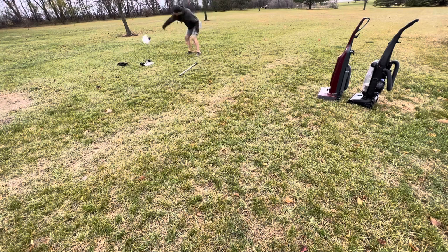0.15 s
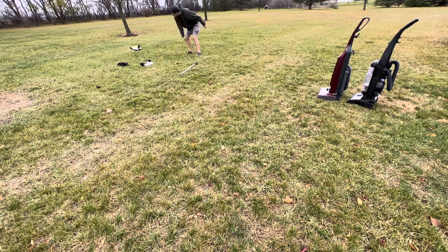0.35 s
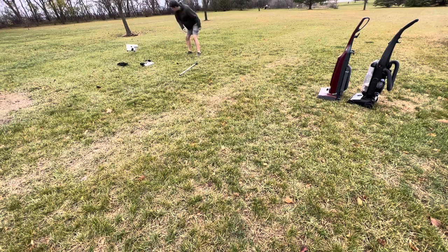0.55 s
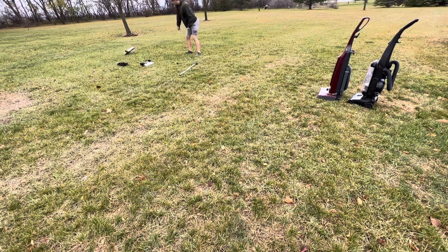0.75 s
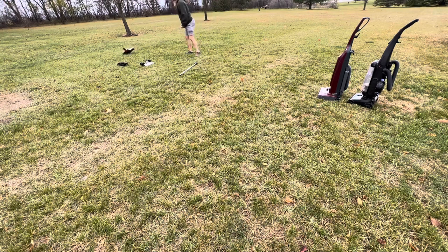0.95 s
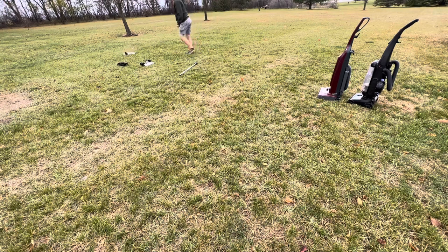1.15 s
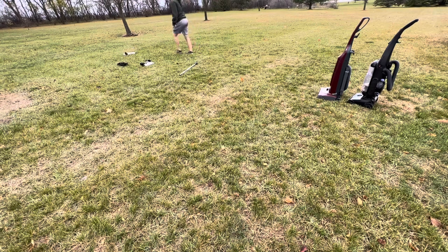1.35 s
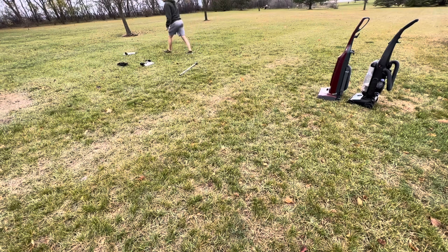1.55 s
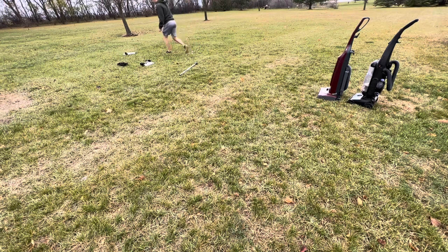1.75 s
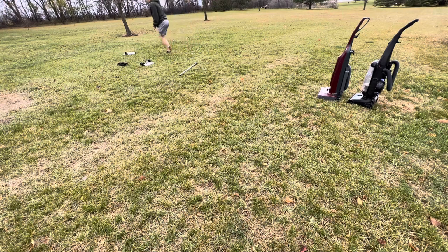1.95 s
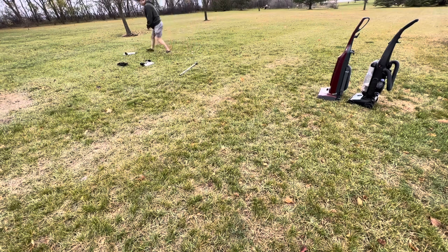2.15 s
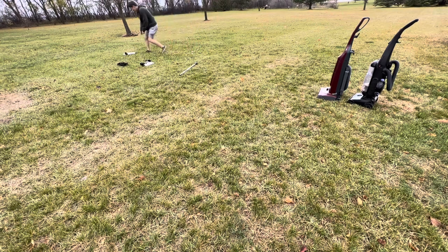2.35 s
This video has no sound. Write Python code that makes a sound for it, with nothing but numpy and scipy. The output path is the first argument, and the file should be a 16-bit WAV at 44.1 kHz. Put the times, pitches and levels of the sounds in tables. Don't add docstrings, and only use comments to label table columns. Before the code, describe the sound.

Wind flutters on an outdoor microphone, then a single sharp, hollow plastic smash with a brief faint echo; light fragment ticks and soft grass rustle follow, with a barely audible bird whistle near the end.

```python
import sys
import numpy as np
from scipy import signal
from scipy.fft import rfft, irfft
from scipy.io import wavfile
from scipy.ndimage import uniform_filter1d, map_coordinates

SR = 44100
rng = np.random.default_rng(int(sys.argv[2]) if len(sys.argv) > 2 else 0)


def waveform_to_disk(signal):
    frames = np.transpose(np.atleast_2d(signal))
    scaled = np.clip(frames, -1, 1) * 32767
    samples = np.round(scaled).astype(np.int16)
    wavfile.write(sys.argv[1], SR, samples)


def voltage_ratio(level):
    return 10 ** (np.asarray(level, float) / 20)


N = 105840

# (frequency [Hz], level [dB])
LAWN_BALANCE = [(150, 1), (1000, 4.5), (2200, -2), (6000, 3), (8300, -15), (9800, -11), (11200, 4),
                (15000, -1)]
# (frequency [Hz], phase [rad])
LAWN_LEAD = [(0, .2), (700, 1.3), (2500, 3.1), (4000, 5.7), (6000, 6.5), (7000, 9.1), (10000, 16),
             (16500, 27)]
# (frequency [Hz], level [dB])
WIDE_BALANCE = [(600, -0.5), (4400, 4.5), (8500, -4)]
SCATTER_DB = -22


def read(points, hz):
    f, v = np.transpose(points)
    return np.interp(np.log(hz + 1), np.log(f + 1), v)


def evened(x):
    return x / np.sqrt(np.mean(x ** 2) + 1e-20)


def coloured(x, points):
    return irfft(rfft(x) * voltage_ratio(read(points, np.fft.rfftfreq(N, 1 / SR))), N)


def drift(rate_hz, count):
    spectrum = rfft(rng.standard_normal((count, N)))
    hz = np.fft.rfftfreq(N, 1 / SR)
    x = irfft(spectrum / (1 + (hz / rate_hz) ** 2), N)
    return x / x.std(1, keepdims=True)


def ports(x, y, same, lead, side):
    hz = np.fft.rfftfreq(N, 1 / SR)
    half_balance = voltage_ratio(read(side, hz) / 2)
    shared, unshared = rfft(x), rfft(y)
    lag = np.exp(-1j * np.interp(hz, *np.transpose(lead)))
    right = same * shared * lag + np.sqrt(1 - same ** 2) * unshared
    return irfft(np.array([shared * half_balance, right / half_balance]), N)


def scatter(x):
    # (frequency [Hz], t60 [s])
    fading = [(300, 0.23), (4000, 0.6), (9000, 0.35), (15000, 0.14)]
    taps = rng.standard_normal((2, SR // 2))
    hz, t, z = signal.stft(taps, SR, nperseg=256)
    decay = voltage_ratio(-60 * t / read(fading, hz)[:, None])
    tail = signal.istft(z * decay, SR, nperseg=256)[1]
    wet = signal.fftconvolve(x[None], tail / np.linalg.norm(tail[0]), axes=1)[:, :N]
    sway_s, sway_hz = 0.00012, (23, 37)
    sway = sum(np.sin(2 * np.pi * f * np.arange(N) / SR) for f in sway_hz)
    at = np.arange(N) + sway_s * SR * sway
    return np.array([map_coordinates(v, [at], order=3) for v in wet])


def knocks(rows, colour, ring):
    # (frequency [Hz], level [dB], t60 [s])
    modes = [(120, 2.5, 0.1), (189.7, -7, 0.036), (260, -5, .03), (360, 4, 0.018), (480, 6.5, 0.05),
             (634, 5.5, 0.0092), (736, -6.5, 0.063), (864.5, 1.5, 0.045), (1030, -6.5, 0.11),
             (1125, 4.5, .04), (1430, -1, 0.03), (1602, -0.5, .03), (1970, 11.5, 0.038)]
    dull_per_db, split_hz = 4.2, 6200
    t = np.arange(N) / SR
    power, push = np.zeros((2, N)), np.zeros(N)
    for s, crack_db, thump_db, length, hz in rows:
        u = np.maximum(t - s, 0)
        treble_db = dull_per_db * min(crack_db + 27.0, 0)
        both_db = crack_db + np.array([[0], [treble_db]])
        attack = (u / (u + 0.25 * length)) ** 2
        power += voltage_ratio(2 * both_db) * attack * np.exp(-u / length * 1.98)
        turns = np.minimum(u * hz, 2)
        hump = np.sin(np.pi * turns / 2) ** 2
        push -= voltage_ratio(thump_db) * hz / SR * hump * np.sin(2 * np.pi * turns)

    grains = rng.standard_normal(N) * voltage_ratio(3.9 * np.minimum(rng.exponential(1, N), 4))
    snaps = evened(coloured(grains, colour))
    low = signal.filtfilt(*signal.butter(2, split_hz, fs=SR), snaps)
    crackle = (np.sqrt(power) * [low, snaps - low]).sum(0)

    u = t[:6000]
    shell = sum(voltage_ratio(db - 60 * u / (t60 * ring)) * np.cos(2 * np.pi * hz * u) for hz, db, t60 in modes)
    thump = signal.oaconvolve(push, shell)[:N]
    return 1.56 * crackle + 1.49 * thump


def smash():
    # (time [s], crackle level [dB], thump level [dB], crackle length [s], push pitch [Hz])
    contacts = [(.2170, -37, -36, .005, 666), (.2195, -21, -36.5, 0.0032, 860),
                (.2215, -13.5, -34, 0.0033, 1200), (.2245, -9, -19, 0.00089, 1015),
                (.2290, -7.5, -15, 0.00075, 682), (.2312, -23, -10.5, 0.0036, 450),
                (.2345, -16, -8, 0.0039, 480), (.2370, -38, -20, 0.004, 175),
                (.2410, -37.5, -23.5, .002, 432), (.2455, -26.5, -24.5, 0.0047, 477),
                (.2530, -30.5, -29, 0.0045, 120), (.262, -36, -31, 0.0067, 290),
                (.282, -44, -39, 0.01, 400)]
    landings = [(.6665, -33, -65, 0.0043, 1300), (.6695, -32, -41, 0.003, 1080),
                (.692, -38.5, -43, 0.0042, 907), (.7072, -39, -60, .0015, 1052),
                (.7112, -35, -44, 0.007, 597), (.8055, -47, -67, 0.0034, 908),
                (.8085, -46, -49, 0.005, 618), (.822, -50.5, -46, 0.016, 615),
                (1.1278, -45, -66, 0.0028, 867), (1.1465, -43, -72, 0.0017, 1000),
                (1.1505, -36, -47, 0.0045, 737), (1.873, -64, -46.5, 0.0045, 600)]
    # (frequency [Hz], level [dB])
    crack_colour = [(500, -13), (1500, -5), (2500, -3.5), (3200, -10), (4500, -8.5), (8000, -11),
                    (11000, -20), (15500, -26)]
    # (frequency [Hz], level [dB])
    grass_colour = [(500, -9), (1600, -5), (2400, 0), (3200, -7.5), (5000, -19), (8000, -6.5),
                    (11000, -10.5), (15500, -24)]
    echo_s, echo_db, echo_hz = 0.150, -34.5, 6600

    blow = knocks(contacts, crack_colour, ring=0.63)
    direct = blow + knocks(landings, grass_colour, ring=1.0)
    tail = scatter(direct)
    dulled = signal.lfilter(*signal.butter(2, echo_hz, fs=SR), blow)
    echo = np.roll(dulled, round(echo_s * SR)) * voltage_ratio([[2.], [-1.]])
    near = ports(direct, 0 * direct, 1, LAWN_LEAD, LAWN_BALANCE)
    around = ports(tail[0], tail[1], 0.4, LAWN_LEAD, LAWN_BALANCE)
    return near + voltage_ratio(echo_db) * echo + voltage_ratio(SCATTER_DB) * around


def ticks():
    # (frequency [Hz], level [dB], t60 [s])
    ribs = [(2020, -3, .012), (3260, 2.5, 0.02), (3720, -7, 0.01), (4080, -2.5, 0.0068), (4620, -5, 0.016),
            (5280, -7, .018), (5760, -4, .02), (6420, -2.5, .015), (7500, -2, .007), (8505, -3, .007),
            (9660, 2, 0.0081), (11000, -1, .007), (12600, -4, .004), (14700, -5, .005)]
    # (time [s], level [dB], best-rung pitch [Hz], spread [octaves])
    strikes = [(0.222, -23, 9000, 1.2), (0.222, -37, 8100, 0.74), (0.225, -18, 4960, 1.2),
               (0.224, -22, 9500, 0.71), (.2298, -17.5, 5560, 0.83), (0.236, -21, 6000, 0.36),
               (0.237, -26, 5500, 0.38), (0.24, -32, 8000, .7), (0.246, -31, 6000, 0.63),
               (.2550, -39, 8400, 0.43), (0.26, -45, 8000, 0.65), (0.667, -53, 11000, 0.84),
               (.6700, -42, 11000, .7), (0.6709, -36.5, 4650, .9), (.6705, -57, 2000, 0.56),
               (0.7069, -34, 9600, 0.64), (.7080, -35.5, 3900, 0.83), (0.713, -40.5, 6000, 1.3),
               (.7150, -53, 7000, 1), (0.7197, -58, 3450, .7), (.8060, -53, 7700, 0.31),
               (0.8103, -44, 4200, 0.35), (0.819, -51, 6200, 0.28), (0.8224, -54, 4000, 0.28),
               (0.834, -53, 4200, 0.33), (1.1469, -41, 10500, 0.53), (1.1484, -38.5, 5100, .7),
               (1.1500, -46, 4500, 0.42), (1.151, -45, 10000, .9), (1.154, -62, 4450, .6),
               (1.321, -61.5, 9030, 0.62)]
    u, out = np.arange(1500) / SR, np.zeros(N)
    hz, db, t60 = np.transpose(ribs)[:, :, None]
    chances = rng.random((len(strikes), 2, len(ribs), 1))
    for (s, tick_db, best_hz, spread), luck in zip(strikes, chances):
        away = np.log2(hz / best_hz) / spread
        rung_db = tick_db + db - 16.0 * away ** 2 + 3.4 * (luck[0] - 0.5)
        rung_hz = hz * (1 + 0.03 * (luck[1] - 0.5))
        ring = voltage_ratio(rung_db - 60 * u / t60) * np.sin(2 * np.pi * rung_hz * u)
        out[round(s * SR):][:len(u)] += ring.sum(0)
    tail = scatter(out)
    near = ports(out, 0 * out, 0.86, LAWN_LEAD, LAWN_BALANCE)
    around = ports(tail[0], tail[1], 0.26, LAWN_LEAD, LAWN_BALANCE)
    return near + voltage_ratio(SCATTER_DB) * around


def grass():
    # (middle time [s], level [dB], length [s])
    brushes = [(0.059, -71, 0.048), (0.499, -76, 0.049), (0.724, -71, 0.15), (1.124, -68, 0.039),
               (1.213, -68.5, 0.06), (1.492, -69.5, 0.11), (1.834, -77.5, 0.061), (1.956, -69, 0.015),
               (2.009, -67, 0.0041), (2.034, -70.5, 0.044), (2.271, -74.5, 0.18)]
    # (frequency [Hz], level [dB])
    hiss = [(2000, -2), (4500, 10), (8500, 15), (13000, -7.5), (15000, -4), (16500, -21)]
    t = np.arange(N) / SR
    swell = sum(voltage_ratio(db) * np.exp(-((t - s) / length) ** 2) for s, db, length in brushes)
    a, b = (evened(coloured(v, hiss)) for v in rng.standard_normal((2, N)))
    rustle = ports(a, b, 0.52, LAWN_LEAD, WIDE_BALANCE)
    return swell * voltage_ratio(2.1 * drift(100.0, count=1)) * rustle


def gusts():
    # (time [s], level [dB])
    strength = [(0, -45), (.22, -50), (.34, -49), (.42, -48), (.6, -47.5), (.72, -42), (.88, -49.5),
                (1.0, -44), (1.18, -48.5), (1.32, -49.5), (1.45, -48.5), (1.64, -44.5), (1.82, -43),
                (1.95, -41.5), (2.14, -54.5), (2.28, -49), (2.4, -50.5)]
    # (frequency [Hz], level [dB])
    rumble = [(18, -14), (40, -8.5), (65, 4.5), (110, -6.5), (200, -14), (350, -20.5), (1500, -95)]
    a, b = (coloured(v, rumble) for v in rng.standard_normal((2, N)))
    low = np.array([a, -0.3 * a + b])
    low = low / np.sqrt(uniform_filter1d(low ** 2, size=3000) + 1e-20)
    gust_db = np.interp(np.arange(N) / SR, *np.transpose(strength)) + 6.0
    side_db = 3.5 * np.array([[0.5], [-0.5]])
    return low * voltage_ratio(gust_db + 2.1 * drift(27.0, count=2) + side_db)


def eddies():
    # (time [s], level [dB], pitch [Hz], left over right [dB])
    puffs = [(0.059, -43, 150, 22.5), (0.102, -38, 144, 12), (0.334, -40, 248, 9.5),
             (0.487, -31.5, 276.3, -1), (0.533, -36.5, 157, 6), (0.648, -27, 269.8, -1.5),
             (0.669, -37.5, 209, -9), (0.684, -27.5, 99.3, 2), (0.758, -33, 197.6, 7), (0.8, -35, 93.6, 4),
             (0.875, -39.5, 264, -0.5), (0.921, -31.5, 164, 3.5), (0.952, -32, 166.4, 14.5),
             (0.988, -48.5, 95.5, 8), (1.016, -33.5, 100.8, 3.5), (1.037, -39.5, 148, 9.5),
             (1.238, -39, 100.7, -2.5), (1.306, -36, 174, 2), (1.358, -36.5, 121.5, 1),
             (1.505, -36, 171, 8.5), (1.608, -40.5, 101.8, 11), (1.645, -36.5, 100.9, 9.5),
             (1.778, -37.5, 101.1, 8.5), (1.873, -30, 151, 7), (2.04, -39, 161, 7.5),
             (2.358, -47.5, 154, 16)]
    # (frequency [Hz], level [dB])
    flutter = [(60, -14), (130, 8), (260, 4), (450, -7.5), (900, -56), (3000, -99)]
    puff_s, flutter_s, flutter_db = 0.014, 0.019, -8.5
    out = np.zeros((2, N))
    chances = rng.random((len(puffs), 2, 3))
    ragged = evened(coloured(rng.standard_normal((2, N)), flutter))
    u = np.arange(5000) / SR
    shape, spread = ((u / w) ** 2 * np.exp(2 - 2 * u / w) for w in (puff_s, flutter_s))
    for (s, db, hz, pan), pair in zip(puffs, chances):
        for c, (turn, glide, late) in enumerate(pair):
            port_db = db + pan * (0.5 - c)
            wobble = 1 + 0.35 * np.sin(2 * np.pi * (late + 42.4 * u))
            f = hz * (1.084 + 0.166 * glide) * np.exp(-u / 0.088) * wobble
            puff = voltage_ratio(port_db) * shape * np.sin(2 * np.pi * (turn + np.cumsum(f) / SR))
            at = round((s - 0.008 + 0.0041 * late) * SR)
            out[c, at:at + len(u)] += puff[:N - at]
            at -= 400
            rag = ragged[c, at:at + len(u)]
            out[c, at:at + len(u)] += voltage_ratio(port_db + flutter_db) * spread[:N - at] * rag
    return out


def bird():
    # (time [s], pitch [Hz], level [dB])
    call = [
        (2.28, 1560, -100),
        (2.306, 1497, -65.5),
        (2.338, 1466, -66.5),
        (2.352, 1355, -61),
        (2.385, 1287, -68),
        (2.398, 1280, -78),
    ]
    t = np.arange(N) / SR
    s, hz, db = np.transpose(call)
    waver = np.sin(2 * np.pi * 31 * t)
    turn = 2 * np.pi * np.cumsum(np.interp(t, s, hz) * (1 + 0.028 * waver)) / SR
    level = voltage_ratio(np.interp(t, s, db) + 17.5 + 2.4 * waver)
    return (t > s[0]) * level * np.sin(turn + np.array([[0], [2.6]]))


def wash():
    # (frequency [Hz], level [dB])
    colour = [(180, -6.5), (600, 3), (1500, -9.5), (2600, -25), (5000, -28.5), (8800, -32), (11500, -48),
              (15000, -50)]
    # (frequency [Hz], likeness [0-1])
    likeness = [(200, 0.98), (700, 0.6), (3000, 0)]
    # (frequency [Hz], phase [rad])
    lead = [(0, 2.52), (3600, 1.7)]
    a, b = (coloured(v, colour) for v in rng.standard_normal((2, N)))
    same = np.clip(read(likeness, np.fft.rfftfreq(N, 1 / SR)), 0, 1)
    patches_db = 1.4 * drift(8.2, count=1) + 1.2 * drift(30.0, count=1)
    return voltage_ratio(-50.5 + patches_db) * evened(ports(a, b, same, lead, WIDE_BALANCE))


def scene():
    return smash() + ticks() + grass() + gusts() + eddies() + bird() + wash()


def band_limit(x):
    return signal.sosfilt(signal.butter(12, 16990, fs=SR, output="sos"), x)


def record(dry):
    # (frequency [Hz], level [dB])
    top_end = [(12500, 0), (13800, 0), (14700, 3), (15700, 2), (16000, -16), (17000, -40)]
    n = np.arange(N)
    fade = np.minimum(np.minimum(n, n[::-1]) / 200, 1)
    low_cut = signal.butter(2, 40, "high", fs=SR, output="sos")
    mix = coloured(signal.sosfilt(low_cut, dry * fade), top_end)
    return band_limit(mix)


dry = scene()
out = record(dry)
waveform_to_disk(out)
```